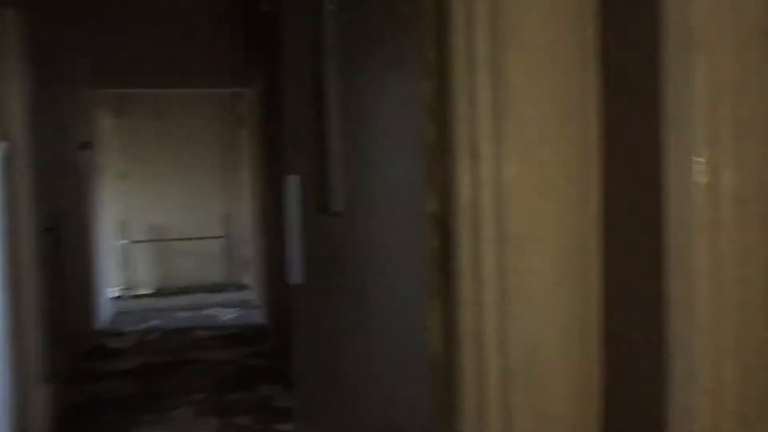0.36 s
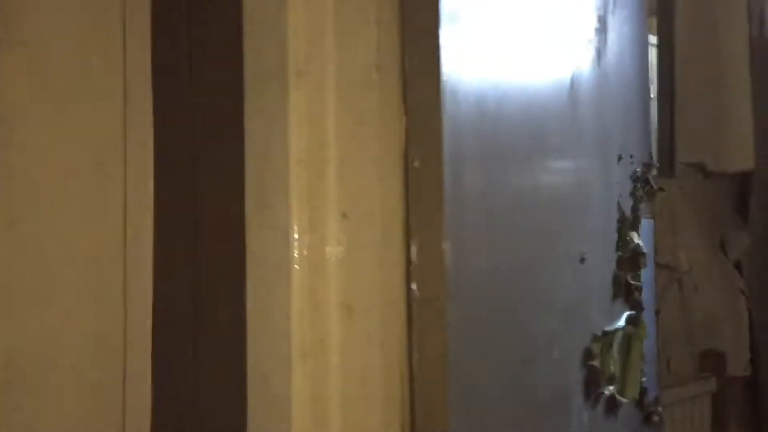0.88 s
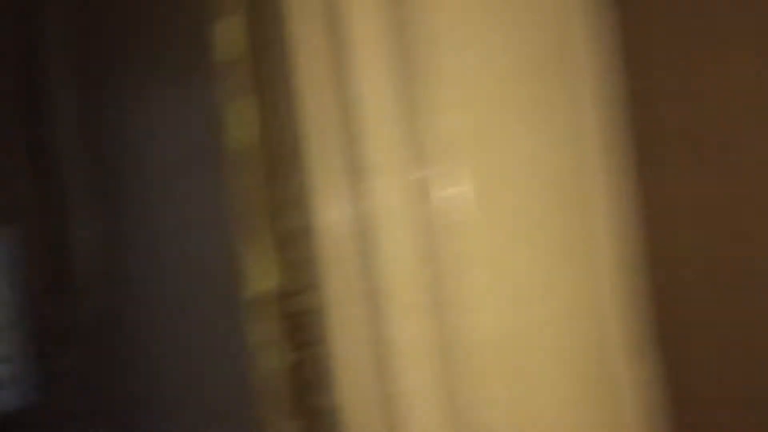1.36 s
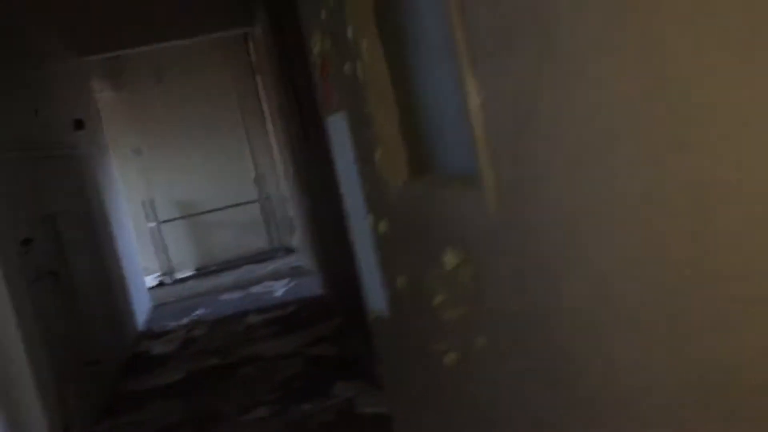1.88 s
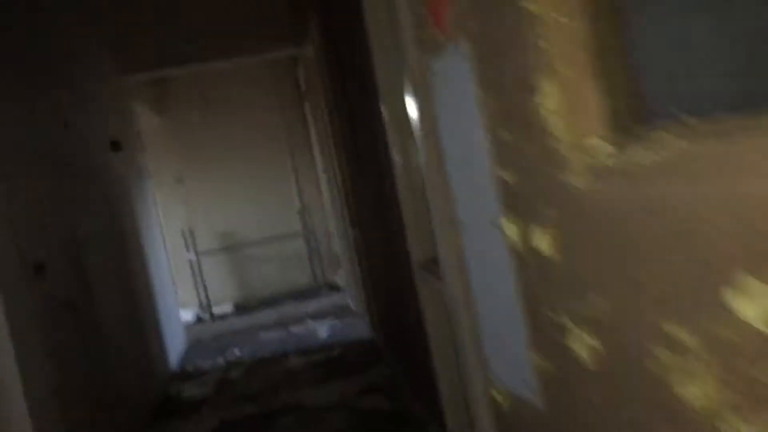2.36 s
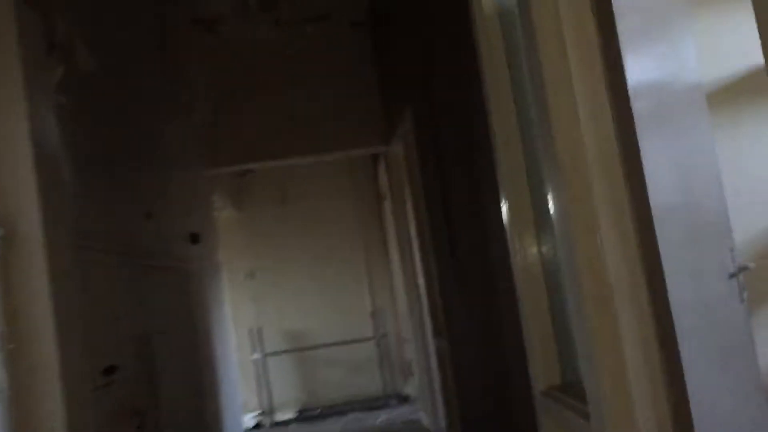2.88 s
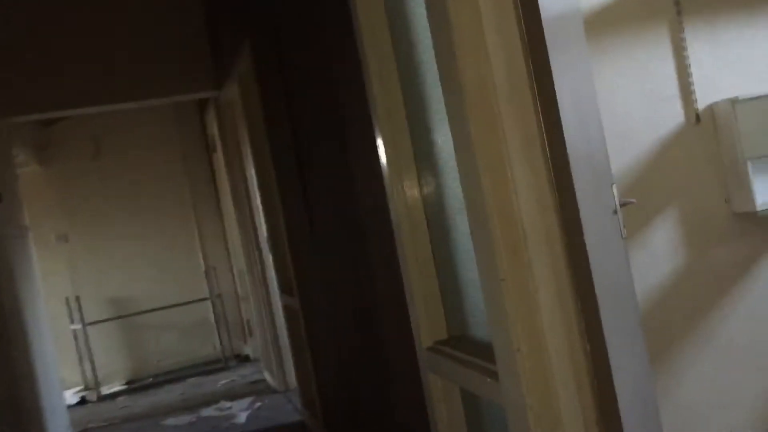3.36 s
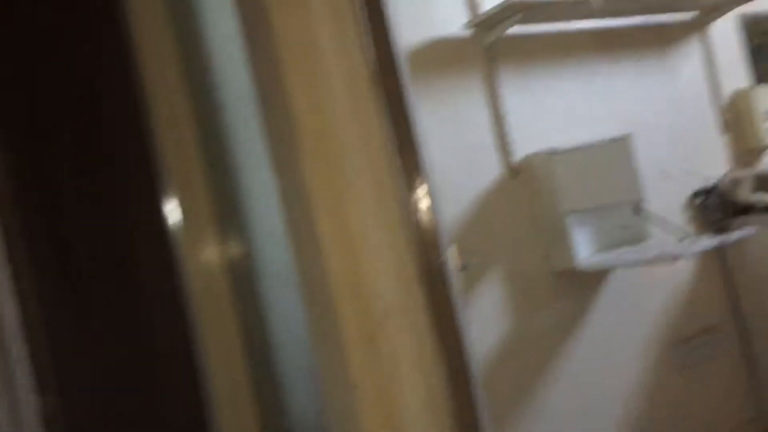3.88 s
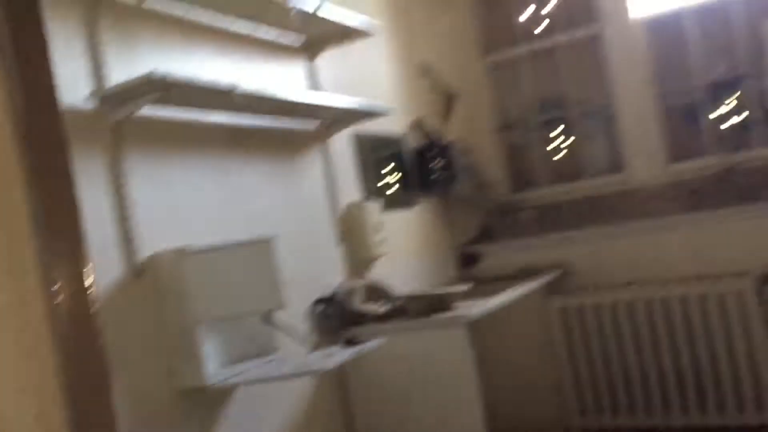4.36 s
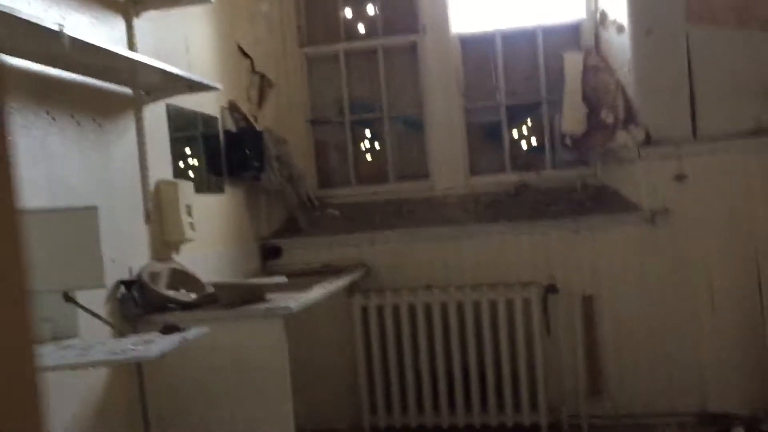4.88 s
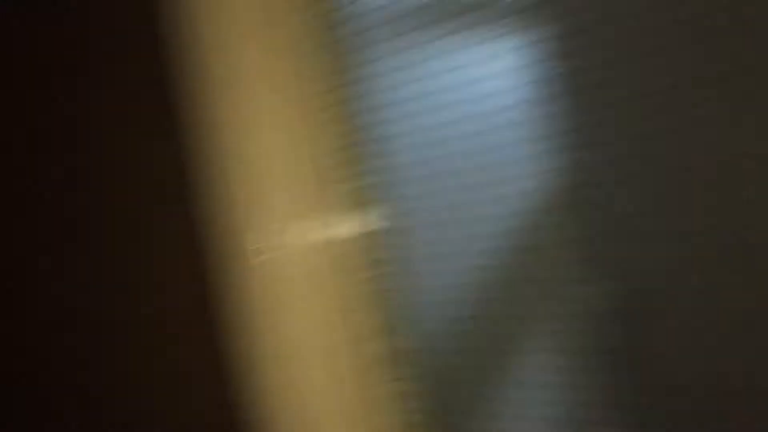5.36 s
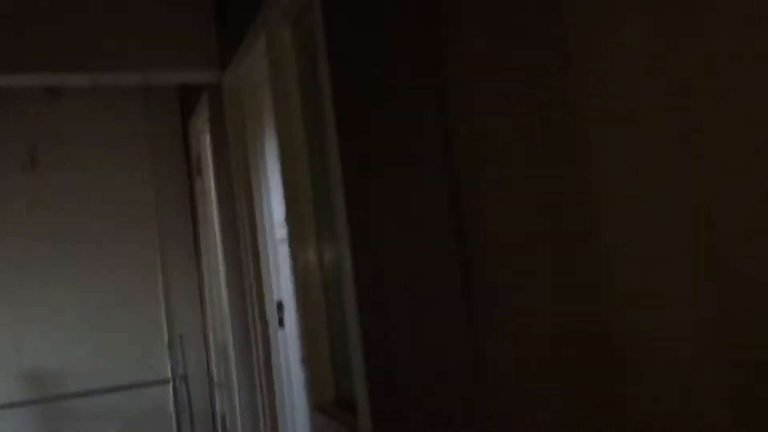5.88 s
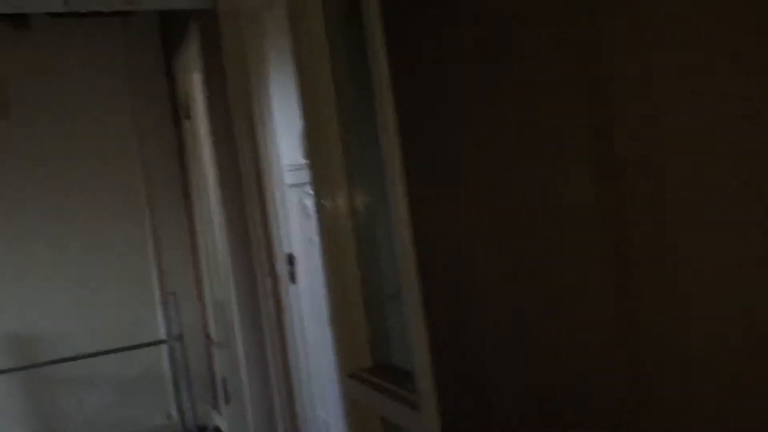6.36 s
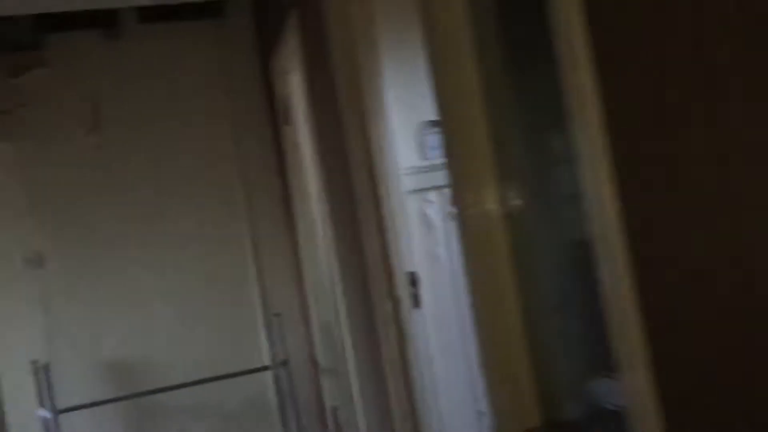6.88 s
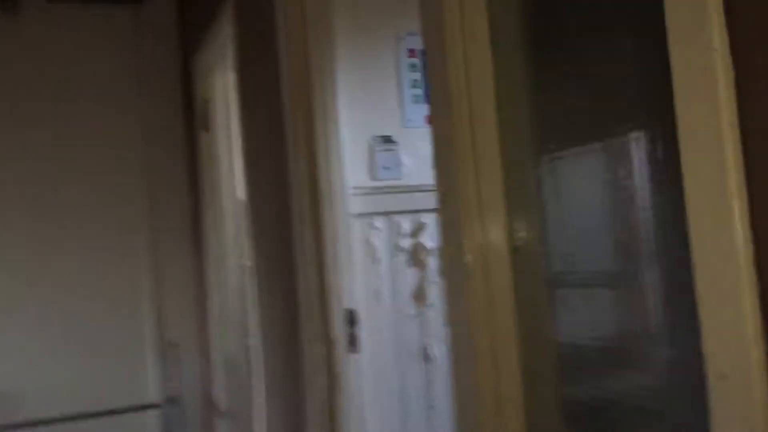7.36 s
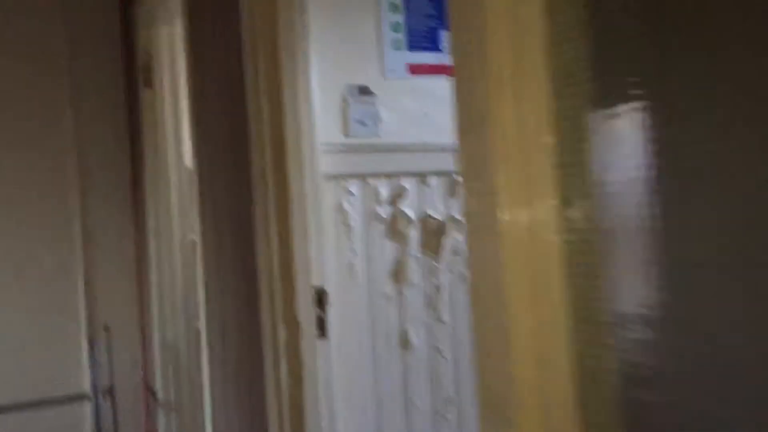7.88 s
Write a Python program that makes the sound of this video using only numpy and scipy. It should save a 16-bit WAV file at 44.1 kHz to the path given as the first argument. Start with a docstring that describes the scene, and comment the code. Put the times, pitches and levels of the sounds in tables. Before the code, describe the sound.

Shoes tread and scuff over loose plaster and grit on a boarded floor in uneven bursts, ending in a loud, heavy crunching grind.

```python
"""Shoes tread, scuff and crush loose plaster and grit on the boarded floor of an empty building.
The grind is thousands of short damped sines in three chip sizes, swelling and easing with the sole.
Single pieces ring, crack and scatter crumbs; heels thump the boards and body weight rolls over them.
A bare corridor answers the debris with decaying noise, and a faint hush of the building and the
microphone of a hand-held camera, shaped noise, lies under all."""
import sys
import numpy as np
from scipy import signal
from scipy.fft import rfft, irfft, next_fast_len
from scipy.io import wavfile
from scipy.ndimage import map_coordinates

SR = 44100
rng = np.random.default_rng(int(sys.argv[2]) if len(sys.argv) > 2 else 0)


def elevation(decibels):
    """Turn decibel levels (scalar or array-like) into linear amplitude ratios."""
    levels = np.asarray(decibels, float)
    return 10 ** (levels / 20)


def transcribe(signal):
    """Save signal, clipped to [-1, 1], as a 16-bit WAV file at the path in sys.argv[1]."""
    frames = np.atleast_2d(signal).T
    limited = np.clip(frames, -1, 1)
    pcm = np.round(limited * 32767).astype(np.int16)
    wavfile.write(sys.argv[1], SR, pcm)


N = 352800


def unit(x):
    """Scaled to rms 1."""
    return x / np.sqrt(np.mean(x ** 2) + 1e-20)


def along(points, hz):
    """(f/Hz, value) points read on a log frequency axis."""
    f, value = np.transpose(points)
    return np.interp(np.log(hz + 1), np.log(f + 1), value)


def curve(points):
    """(t/s, value) points joined by straight lines, one value per sample."""
    s, value = np.transpose(points)
    return np.interp(np.arange(N) / SR, s, value)


def wobble(rate):
    """A smooth random curve, rate knots a second."""
    knots = rng.standard_normal(int(N * rate / SR) + 4)
    return map_coordinates(knots, [np.arange(N) * rate / SR])


def filtered(x, response):
    """x shaped by a complex response of frequency."""
    size = next_fast_len(N + SR // 2)
    return irfft(rfft(x, size) * response(np.fft.rfftfreq(size, 1 / SR)), size)[:N]


def peak(f, hz, width_hz):
    """One causal resonance, 1 at its centre."""
    return 1j * f * width_hz / (hz * hz - f * f + 1j * f * width_hz)


def high_pass(f, hz):
    """A causal second-order cut of the bass."""
    return -f * f / (hz * hz - f * f + 1j * np.sqrt(2) * f * hz)


def rings(start, hz, cycles, gain, size):
    """A sum of damped sines, size samples each; every one falls 30 dB in its number of cycles."""
    turns = np.arange(size) * hz[:, None] / SR
    decay = np.exp(-np.log(1000) * turns / (2 * np.reshape(cycles, (-1, 1))))
    onset = 1 - np.exp(-2 * turns)
    shape = np.sin(2 * np.pi * turns) * decay * onset
    where = start[:, None] + np.arange(size)
    return np.bincount(where.ravel(), (gain[:, None] * shape).ravel(), N + size)[:N]


def pressed(rows, fade=1):
    """Gain over time of each row: a swell up to its moment, an easing hold, a fade."""
    s, db, rise, hold, t60 = np.transpose(rows)[:5, :, None]
    t = np.arange(0, N, 32) / SR - s  # one value every 32 samples
    held = np.clip(t, 0, hold)
    swell_db = 29.5 * np.minimum(t, 0) / rise  # 29.5 dB in each rise time
    sag_db = 23 * held  # the hold eases by 23 dB a second
    fade_db = 60 * np.maximum(t - held, 0) / (fade * t60)
    return elevation(db + swell_db - sag_db - fade_db)


def together(gains, rest_db):
    """Overlapping gains and a resting level add in power; one value per sample."""
    total = np.sqrt(np.sum(gains ** 2, axis=0) + elevation(rest_db) ** 2)
    return np.interp(np.arange(N), np.linspace(0, N, len(total), endpoint=False), total)


def crushed(kind, hz, envelope, size):
    """Chips of one size crack at random, some louder than most, under curves of pitch and level."""
    octaves, cycles, rate = kind
    when, sign, luck = rng.random((3, int(rate * N / SR)))
    spread = rng.standard_normal(len(when)).clip(-2, 2)
    start = (when * N).astype(int)
    pitch = np.clip(hz[start] * 2 ** (octaves * spread), 200, SR / 2.6)
    loudness = elevation(-2.6 * np.log(1 - .997 * luck))  # a long tail of loud cracks
    gain = np.sign(sign - .5) * loudness * np.sqrt(pitch)
    # the even, unshaped stream sets the level, so the envelope is its rms
    level = np.sqrt(np.mean(rings(start, pitch, cycles, gain, size) ** 2))
    return rings(start, pitch, cycles, gain * envelope[start] / level, size)


# the sole presses or drags on the debris: (t/s at full pressure, level/dB before the slip, rise/s,
# hold/s, fade t60/s, coarse lumps level/dB above that, fine grit level/dB above that)
SOLE_PRESSES = [(0.0, -49, .01, 0.034, 0.041, -8, -2), (0.244, -54, 0.0086, 0.023, 0.12, -2, -12),
                (0.276, -51.5, 0.0064, 0.018, .08, -20, 6), (0.369, -40.5, 0.022, .005, 0.2, -11.5, 2.5),
                (0.59, -51, 0.3, .005, .05, -12, 0.5), (0.605, -42, 0.0078, .15, 0.21, -5.5, 2),
                (0.815, -40.5, 0.021, 0.0018, .2, -18, -15), (0.864, -53, .03, 0.02, 0.25, -21, 7.5),
                (1.102, -37.5, 0.016, 0.0068, 0.16, -4, 0.5), (1.293, -41.5, 0.038, 0.38, 0.13, -30, -0.5),
                (1.389, -46.5, .06, 0.022, 0.6, 6.5, 7), (1.51, -51, .03, 0.06, 0.14, -18, -10),
                (1.912, -65, 0.0077, 0.0043, 0.34, -15, 9), (2.09, -56.5, 0.3, .005, .45, -7, -3.5),
                (2.17, -44.5, 0.018, 0.29, 0.25, -4, -1.5), (2.437, -44.5, 0.076, .005, 0.29, -6, -17),
                (2.6, -62.5, 0.14, .005, 0.42, 0, -3), (2.891, -46.5, 0.14, .03, .2, -21, -14),
                (2.938, -39, 0.097, .02, 0.6, 1.5, -3.5), (3.045, -39.5, 0.081, 0.035, 0.47, -4.5, -8.5),
                (3.276, -53.5, 0.025, 0.03, 0.13, 4, 5), (3.305, -30.5, 0.013, .002, 0.078, 2.5, -11),
                (3.325, -43, .02, .01, 0.59, 2.5, -6.5), (3.6, -50.5, .012, 0.063, 0.26, -5, 0),
                (3.625, -40.5, 0.046, .005, 0.19, -9, -10), (3.748, -47, 0.24, .005, 0.66, -12, -11.5),
                (3.785, -53.5, .01, 0.02, 0.21, -15, 8), (3.84, -38, 0.02, 0.045, 0.24, -32, -30),
                (4.295, -61, .04, .005, .15, -18, -10), (4.395, -62, 0.017, .02, 0.23, -25, -22),
                (4.528, -44, 0.068, 0.15, 0.28, -10.5, -9), (4.766, -58, .06, .005, 1, -3, -21),
                (4.91, -59.5, .1, .005, 0.35, -4, -23), (5.163, -63, .004, 0.0055, 0.11, -20, 11),
                (5.17, -63, .06, 0.035, .2, -20, -9), (5.219, -53.5, .01, 0.035, .2, -30, 7),
                (5.28, -42.5, 0.12, .005, 0.42, -32, 2.5), (5.338, -38, 0.022, .005, 0.6, -7, -12),
                (5.627, -54.5, 0.14, .005, 0.23, -12, -4), (5.669, -48, .015, 0.06, 0.46, -2.5, -2.5),
                (5.82, -62, 0.047, 0.062, .3, -20, 15.5), (5.894, -45, 0.081, 0.0046, 0.95, -16, 1.5),
                (6.031, -41.5, 0.084, 0.11, 0.42, -10, -9), (6.412, -69.5, 0.013, 0.034, 0.39, -30, 16),
                (6.597, -49, 0.13, 0.0056, .1, -7, -6), (6.602, -37, .008, 0.0044, 0.3, -11, -0.5),
                (6.704, -41.5, 0.089, 0.018, .3, -5, 6), (6.765, -26.5, 0.028, 0.055, 0.34, -9.5, -5),
                (6.824, -21, 0.14, 0.0073, 0.22, -21, -1), (6.897, -32, .05, 0.13, 0.71, -20, -1),
                (6.948, -37.5, 0.026, 0.022, 0.16, -4.5, 5), (7.097, -31, 0.2, 0.18, 0.54, -41, 1),
                (7.381, -31, 0.15, 0.0055, 0.36, -31.5, -2.5), (7.671, -43, 0.39, 0.1, 0.17, -16, -1),
                (7.995, -58, 0.27, 0.0087, .3, 1.5, 3.5)]
# pitch of the chips underfoot along the walk: (t/s, f/Hz)
CHIP_PITCH_WALK = [(0.0, 3570), (0.24, 1810), (0.31, 2680), (0.84, 2090), (0.87, 3500), (1.42, 2340),
                   (1.51, 3520), (1.98, 2160), (2.49, 3040), (2.78, 2030), (3.41, 2650), (5.06, 2060),
                   (5.17, 4240), (5.39, 2050), (5.75, 3080), (5.95, 2260), (6.04, 3680), (6.26, 2470),
                   (7.96, 2530), (8.0, 3030)]
# pitch of the grit underfoot along the walk: (t/s, f/Hz)
GRIT_PITCH_WALK = [(0, 9000), (1.2, 9400), (2, 8500), (3.4, 8300), (3.8, 10100), (4.7, 8000), (5.1, 11000),
                   (6.05, 11500), (6.2, 7950), (6.45, 11000), (6.7, 8600), (8, 9100)]
# chip sizes: (pitch spread/octaves, ringing/cycles, chips a second)
LUMPS, CHIPS, GRIT = (0.33, 1.87, 900), (0.52, 2.33, 3000), (0.7, 2.83, 5000)
SHARDS = (0.71, 2.5, 70)  # small pieces cracking singly in the grind
# debris stirring between the steps, level/dB before the slip
CHIPS_REST_DB, LUMPS_REST_DB, GRIT_REST_DB = -73, -95, -73.5


def crunch():
    """Grinding follows the sole, which sticks and slips; pieces of changing size drift its colour."""
    lumps_db, grit_db = np.transpose(SOLE_PRESSES)[5:, :, None]
    presses = pressed(SOLE_PRESSES)
    lump_presses = pressed(SOLE_PRESSES, fade=0.88) * elevation(lumps_db)  # lumps settle sooner
    slip = elevation(-4.0 + 1.4 * wobble(30))
    push = slip * together(presses, CHIPS_REST_DB)
    heave = slip * together(lump_presses, LUMPS_REST_DB)
    rasp = slip * together(presses * elevation(grit_db), GRIT_REST_DB)

    coarse, medium, fine = (2 ** (.13 * wobble(45)) for _ in range(3))  # pitch drifts
    lumps = crushed(LUMPS, 850 * coarse, heave * elevation(-1.5 + 2.35 * wobble(40)), size=400)
    chips = crushed(CHIPS, curve(CHIP_PITCH_WALK) * medium, push * elevation(0.92 * wobble(90)), size=170)
    grit = crushed(GRIT, curve(GRIT_PITCH_WALK) * fine, rasp * elevation(1.9 + 0.86 * wobble(90)), size=40)
    shards = crushed(SHARDS, 3500 * medium, np.sqrt(push * rasp) * elevation(-11.5), size=170)

    low = filtered(lumps, lambda f: high_pass(f, 520))
    high = filtered(chips + grit + shards, lambda f: high_pass(f, 1106))
    return low + high


# pieces that break: (t/s, level/dB before ring and crack are balanced, f/Hz,
# crumbs level/dB relative to that, fine crumbs level/dB relative to the crumbs before a common lift)
BREAKING_PIECES = [(0.015, -32, 3520, -22, -8), (0.248, -45, 1560, -10, -14), (0.278, -40, 1880, -27, -12),
                   (0.364, -29, 1880, -17.5, -19), (0.528, -32, 8650, -22, -17),
                   (0.561, -30, 8700, -17, -15), (0.605, -29.5, 1820, -15, 0),
                   (0.624, -30.5, 1020, -12, -3), (0.699, -35, 1290, -14, -14),
                   (0.817, -23.5, 1230, -15, -11.5), (0.832, -28.5, 1180, -25, 1),
                   (0.867, -19.5, 4060, -25, -12), (1.099, -20.5, 3930, -30, -12),
                   (1.209, -43.5, 2940, -19, 4), (1.275, -32, 1330, -11.5, -8),
                   (1.29, -15, 6300, -16.5, -8.5), (1.356, -21, 9600, -16.5, -1),
                   (1.392, -25, 1620, -21, 0), (1.515, -26, 3970, -15.5, -8), (1.61, -24, 9310, -19, -14),
                   (1.639, -31, 3900, -20, -8), (1.912, -49, 1980, -16, -1), (2.093, -34.5, 2950, -20, -10),
                   (2.173, -32, 1060, -23, -30), (2.252, -45, 2240, -22, -10),
                   (2.338, -29.5, 2820, -16.5, 3), (2.438, -34.5, 630, -13, -8),
                   (2.872, -45, 1530, -22, -12), (2.893, -31.5, 2060, -13, -5),
                   (3.021, -26.5, 1300, -14, -16), (3.042, -27.5, 1180, -12.5, -15),
                   (3.275, -44, 1510, -13, -10), (3.304, -20.5, 3280, -17, -14),
                   (3.393, -31.5, 2670, -17.5, -2), (3.611, -34, 1910, -16, -17),
                   (3.648, -30, 3850, -15, -10), (3.74, -31.5, 2060, -14.5, -22),
                   (3.792, -37.5, 1240, -12.5, -8), (3.846, -34, 3900, -0.5, -34),
                   (4.324, -42.5, 10000, -15, -11), (4.415, -46, 2130, -8, -15),
                   (4.525, -27.5, 2060, -27, -18), (4.665, -36, 3250, -17, -12),
                   (4.766, -42, 1470, -15.5, -12), (4.916, -45.5, 650, -14, -17),
                   (4.943, -45.5, 770, -18, -16), (5.164, -36, 4570, -22, -20),
                   (5.212, -37.5, 3700, -10.5, -5), (5.26, -28, 6210, -15, -8),
                   (5.346, -30.5, 2380, -7.5, -16), (5.624, -39, 2190, -16, -6),
                   (5.67, -29, 3630, -18, -19), (5.713, -29, 6240, -10.5, -16), (5.819, -33, 9480, -13, -7),
                   (5.84, -26, 11100, -11, -23), (5.87, -24.5, 8850, -14, -9), (6.03, -25.5, 4360, -18, 1),
                   (6.061, -28, 4030, -19.5, 2.5), (6.414, -49, 6250, -22, -5),
                   (6.547, -44.5, 1260, -10, -7.5), (6.603, -23, 2580, -30, -2),
                   (6.708, -20.5, 6770, -18, -14), (6.765, -15.5, 2340, -15, -3),
                   (6.785, -16, 2160, -13, 0), (6.962, -13.5, 2280, -14.5, -5.5),
                   (7.015, -22.5, 1730, -16.5, -3), (7.086, -13.5, 1600, -27.5, -9),
                   (7.143, -24, 2410, -22, -2), (7.176, -24, 2360, -10, -18), (7.2, -19, 4300, -13.5, -4),
                   (7.366, -26, 1750, -12, -19), (7.969, -35.5, 5420, -13, -17)]


def snaps(count=120):
    """A breaking piece rings over a dry crack; of its count crumbs half ring near its pitch, half fine."""
    s, db, hz, crumbs_db, fine_db = np.transpose(BREAKING_PIECES)
    start = np.round(s * SR).astype(int)
    ring = elevation(-6.0) * rings(start, hz, 11.8, elevation(db), size=800)
    # the break itself is broad and dry
    crack = rings(start, np.clip(1.84 * hz, 200, 8000), 1.8, elevation(db + 9), size=120)

    late, sign, kin = np.moveaxis(rng.random((len(s), 3, count)), 1, 0)
    spread = rng.standard_normal((len(s), count)).clip(-2, 2)
    late = .07 * late ** 1.5  # seconds, thickest just after the break
    large = kin < .5
    near_pitch, fine_pitch = hz[:, None] * 2 ** (0.06 * spread), 8000 * 2 ** (0.58 * spread)
    pitch = np.where(large, near_pitch, fine_pitch).clip(200, SR / 2.6)
    cycles = np.where(large, 11, 4)  # the larger crumbs ring longer
    size_db = np.where(large, 1.5, fine_db[:, None] + 16.5)
    fall_db = 60 * late / 0.3
    gain = np.sign(sign - .5) * elevation((db + crumbs_db)[:, None] - fall_db + size_db)
    crumb_start = (start[:, None] + late * SR).astype(int)
    crumbs = rings(crumb_start.ravel(), pitch.ravel(), cycles.ravel(), gain.ravel(), size=400)
    return ring + crack + crumbs


# resonances of the boards and joists: (f/Hz, width/Hz, level/dB)
BOARD_MODES = [(61.75, 9.6, -6.5), (86.7, 15, -5.5), (122, 34, -2.5), (178, 16, -2.5), (212, 55, -13),
               (278, 35, -1)]


def wood(f):
    """The boards and joists as resonances of alternating sign."""
    return sum((-1) ** k * elevation(db) * peak(f, hz, width)
               for k, (hz, width, db) in enumerate(BOARD_MODES))


# heel and toe landings: (t/s, level/dB before the boards answer, f/Hz, t60/s,
# rattle level/dB relative to that before its filter and lift)
LANDINGS = [(0.608, -48.5, 103.7, 0.41, 0.5), (1.267, -54, 181.2, 0.52, -5),
            (1.595, -55.5, 142.3, 0.45, -7), (2.164, -37.5, 148, 0.43, -5.5), (2.434, -67, 178, 0.28, 9),
            (2.89, -47.5, 108, 0.22, -1), (2.946, -37.5, 195.8, 0.43, -14), (2.964, -29, 80, 0.23, -34),
            (3.315, -51, 198, 0.25, -5), (3.582, -60, 177, 0.37, -0.5), (3.721, -38.5, 165.8, 0.49, -25),
            (3.761, -42, 74, 0.31, -29), (3.83, -49, 93, 0.32, -8.5), (4.445, -41.5, 138.5, 0.57, -19),
            (4.49, -39.5, 108, 0.36, -36), (4.545, -43.5, 164.6, 0.4, -17), (5.217, -36, 91, 0.17, -25),
            (5.238, -45.5, 171, 0.4, -19), (5.338, -32, 116, 0.25, -33), (5.356, -44, 293.6, 0.37, -18),
            (5.391, -45, 67, 0.22, -21), (5.892, -37, 103, 0.27, -18), (6.012, -49.5, 296, 0.33, -16),
            (6.019, -44, 100.2, 0.48, -18), (6.605, -38.5, 113, 0.34, -43), (6.761, -37, 113.5, 0.19, -32),
            (7.246, -32.5, 95.5, 0.16, -9.5), (7.3, -34.5, 130.2, 0.2, -34),
            (7.546, -36.5, 181.6, 0.4, -14.5)]


def thumps():
    """A landing is a damped push near its pitch, the boards' answer to it, and a short dull rattle."""
    push, rattle, t = np.zeros(N + SR), np.zeros(N + SR), np.arange(SR // 2) / SR
    for s, db, hz, t60, rattle_db in LANDINGS:
        phase = np.cumsum(rng.normal(0, 0.05, len(t)))  # the contact shifts, so the pitch is unsteady
        phase -= 2 * np.pi * hz * 0.0029 * np.exp(-t / 0.019)  # and sags as the sole flattens
        fade = elevation(db - 60 * t / t60) * (1 - np.exp(-t / 0.0015))
        here = slice(round(s * SR), round(s * SR) + len(t))
        push[here] += fade * np.sin(2 * np.pi * hz * t + phase)
        rattle[here] += fade * elevation(rattle_db) * rng.standard_normal(len(t))
    answer = filtered(push[:N], wood)
    dull = filtered(rattle[:N], lambda f: peak(f, 296, 244) ** 2 + elevation(3.5) * wood(f))
    return push[:N] + elevation(-13.0) * answer + elevation(23.0) * dull


# body weight rolling over the boards: (t/s at full weight, level/dB before the wobble,
# rise/s, hold/s, fade t60/s)
WEIGHT_SHIFTS = [(.63, -49, 0.11, .01, 0.2), (1.38, -64, .1, .01, 1.1), (2.186, -44, 0.028, 0.023, 0.35),
                 (2.97, -38.5, 0.047, 0.067, 0.51), (3.349, -52, 0.097, .01, 0.41),
                 (3.8, -50, 0.096, 0.092, 0.55), (4.56, -56.5, .1, 0.094, 0.57),
                 (5.225, -44, 0.033, 0.088, 0.71), (5.401, -41.5, .1, 0.027, .6),
                 (5.6, -51, .15, 0.2, 0.13), (5.93, -47.5, 0.12, 0.2, 0.23), (6.242, -56, .15, 0.011, 0.36),
                 (6.615, -57, .02, .12, .5), (6.863, -47.5, 0.4, .02, 1), (7.26, -46.5, 0.033, 0.16, 0.27),
                 (7.58, -44, .06, 0.037, 0.41)]


def rolling_weight():
    """Shifting weight shakes the lowest modes: dull noise and a hum, unsteady in level."""
    noise = rng.standard_normal(N)
    rumble = unit(filtered(noise, lambda f: wood(f) * peak(f, 64, 75) ** 2))
    sway = np.cumsum(rng.normal(0, 0.0304, N))  # the hum's phase wanders
    hum = np.sin(2 * np.pi * BOARD_MODES[0][0] * np.arange(N) / SR + sway)  # lowest joist mode
    weight = together(pressed(WEIGHT_SHIFTS), -74)  # the boards never lie quite still
    return weight * elevation(3.4 * wobble(10)) * (elevation(-4) * rumble + elevation(1.5) * hum)


def boards():
    """Landings and rolling weight on short boards, which radiate little deep bass."""
    return filtered(thumps() + rolling_weight(), lambda f: high_pass(f, 40.6))


# how fast the corridor's answer dies: (f/Hz, t60/s)
CORRIDOR_DECAY = [(100, 0.16), (1000, 0.35), (4000, 0.34), (12000, 0.23)]


def corridor(x):
    """Noise tails, each frequency dying at its own speed; the walker's spot is new every fifth of a second."""
    out, step = np.zeros(N + SR), SR // 5
    for at in range(0, N, step):
        hz, t, bins = signal.stft(rng.standard_normal(SR // 3), SR, nperseg=256)
        decay = elevation(-60 * t / along(CORRIDOR_DECAY, hz)[:, None])
        tail = signal.istft(bins * decay, SR, nperseg=256)[1]
        answer = signal.fftconvolve(x[at:at + step], tail / np.linalg.norm(tail))
        out[at + 130:][:len(answer)] += answer  # 130 samples, about 3 ms, late
    return out[:N]


# colour of the hush, relative: (f/Hz, level/dB per Hz)
HUSH_COLOUR = [(15, -43), (25, -8), (70, -2), (270, 1), (516, -5.5), (1650, -8.5), (2160, -9),
               (4370, -15.5), (4870, -20), (5880, -14.5), (10400, -24), (13600, -15), (16000, -47)]


def hush():
    """Smooth far noise that drifts a little in level."""
    noise = unit(filtered(rng.standard_normal(N), lambda f: elevation(along(HUSH_COLOUR, f))))
    return elevation(-66 + wobble(3)) * noise


# bands the camera body shades from the microphone: (f/Hz, width/Hz, depth 0-1)
SHADED_BANDS = [(4910, 94, 1), (10370, 240, 0.98)]


def camera_body(x):
    """The camera body shades the microphone: narrow bands are notched out."""
    def shade(f):
        return np.prod([1 - depth * peak(f, hz, width) for hz, width, depth in SHADED_BANDS], axis=0)
    return filtered(x, shade)


def scene():
    """The steps, the corridor's answer to the debris, and the hush."""
    debris = crunch() + snaps()
    return (debris + elevation(-8.5) * corridor(debris) + boards() + hush())[None]


def low_pass(x):
    """Removes everything above the highest recorded frequency."""
    return signal.sosfilt(signal.butter(12, 16660, fs=SR, output="sos"), x)


def record(dry):
    """The scene as the shaded microphone hears it."""
    mix = camera_body(dry[0])[None]
    return low_pass(mix)


dry = scene()
out = record(dry)
transcribe(out)
```